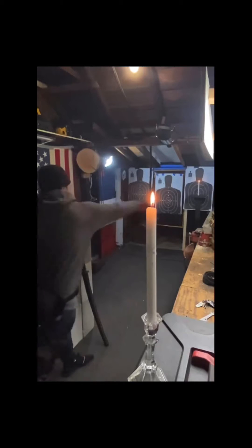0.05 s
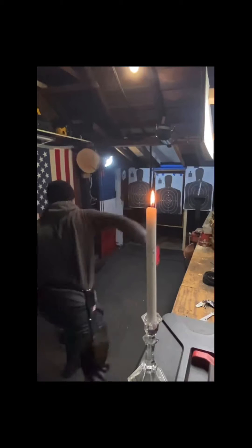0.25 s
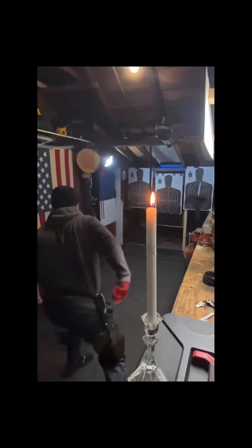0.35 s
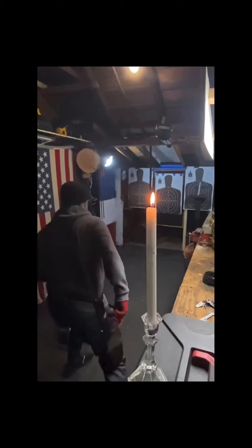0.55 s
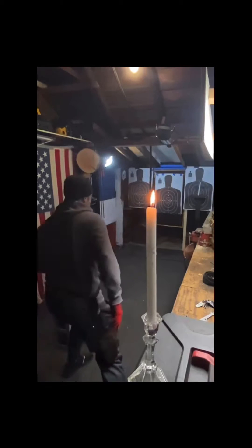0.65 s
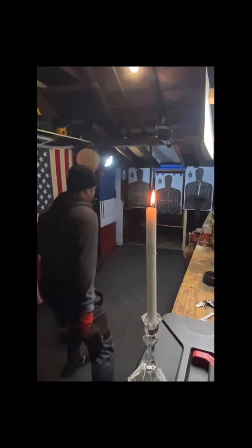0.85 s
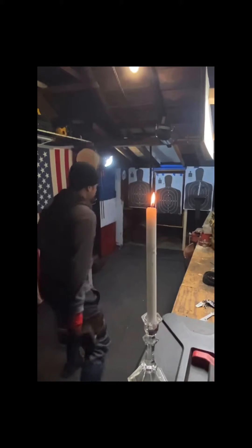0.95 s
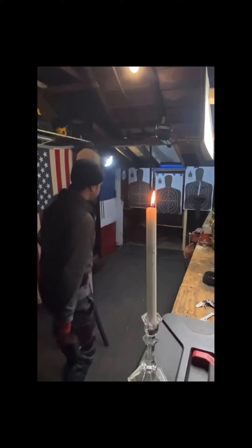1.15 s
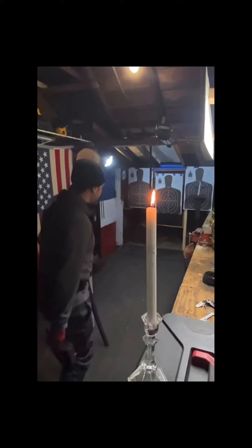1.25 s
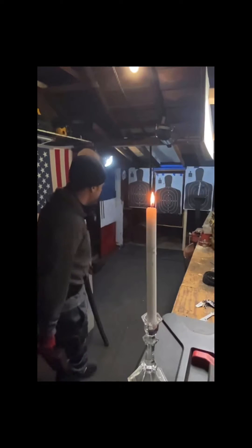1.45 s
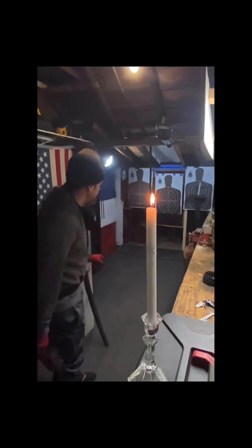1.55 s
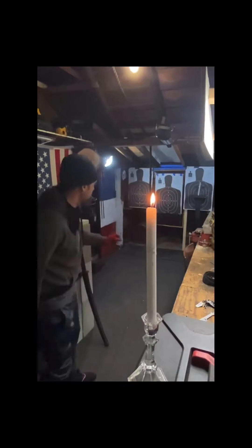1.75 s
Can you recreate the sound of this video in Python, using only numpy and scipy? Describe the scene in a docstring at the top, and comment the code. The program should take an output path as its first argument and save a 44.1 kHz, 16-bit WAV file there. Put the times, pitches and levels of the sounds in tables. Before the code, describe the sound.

A thrown knife sticks into a wooden target with a steel crack and hollow, booming knock

```python
"""A steel crack, a hollow knock and a boom in the room: a thrown knife sticks in a wooden target.
Before and after, clothes and shoes rustle over the quiet floor of a cluttered garage, where a low hum wavers.
Blade, board and room modes are decaying sines; the echo is noise that dies away band by band.
Cloth is dense random grains with hiss and ticks. Left and right are placed as for a microphone pair:
the blade is louder on the right, the knock and boom equal on both sides. No distance is simulated."""
import sys
import numpy as np
from scipy import signal
from scipy.io import wavfile

SR = 44100
rng = np.random.default_rng(int(sys.argv[2]) if len(sys.argv) > 2 else 0)


def put_to_file(sound):
    """Save the sound as 16-bit audio at rate SR, in the file named by the first command-line argument."""
    columns = np.atleast_2d(sound).T  # one column per channel
    safe = np.clip(columns, -1, 1)
    whole_steps = np.round(safe * 32767)
    wavfile.write(sys.argv[1], SR, whole_steps.astype(np.int16))


N = 79380
TIME_S = np.arange(N) / SR
OPPOSED = np.array([[1], [-1]])  # left and right in opposite polarity

# swells of clothes and shoes: (peak time [s], rise [s], fall t60 [s],
# relative body level [dB], relative hiss level [dB])
RUSTLE_SWELLS = [(.005, 0.036, 0.13, -54, -65.5), (0.059, 0.12, 0.86, -66, -69.5),
                 (0.194, 0.027, 1, -59, -89), (0.735, 0.028, 0.29, -61.5, -74.5),
                 (0.798, 0.014, .2, -89, -80.5), (.90, 0.034, 0.54, -70, -71),
                 (1.062, 0.016, 0.364, -68.5, -89), (1.12, 0.05, 0.84, -85.5, -75),
                 (1.195, 0.025, 0.24, -69.5, -78.5), (1.30, 0.043, 0.24, -76, -76.5),
                 (1.36, 0.035, 0.29, -77, -80), (1.439, 0.028, 0.48, -84, -77),
                 (1.497, 0.018, 0.3, -65.5, -80), (1.646, 0.031, 0.42, -64, -82),
                 (1.69, 0.044, 0.34, -77.5, -78.5), (1.795, 0.017, 0.18, -53.5, -74.5)]
# colour of the cloth body: (frequency [Hz], relative density [dB per Hz])
CLOTH_COLOUR = [(410, -29), (700, 0.5), (1160, -5.5), (1570, -4.5), (1850, -9), (2700, -7), (3860, -9),
                (4460, -8.5), (6000, -19.5), (7800, -47), (13200, -120)]
# colour of the fine cloth hiss: (frequency [Hz], relative density [dB per Hz])
HISS_COLOUR = [(4500, -14), (6000, -1.5), (8000, -2), (10500, -8), (13000, -11.5)]
# small ticks of gear: (time [s], strike level [dB], pitch [Hz], t60 [s])
GEAR_TICKS = [(.728, -59.5, 2985, 0.0079), (1.0462, -52, 2800, 0.0039), (1.1766, -51.5, 3900, 0.0043),
              (1.497, -57.5, 3500, 0.0054), (1.6255, -46.5, 775, 0.047), (1.633, -52, 910, 0.023),
              (1.638, -48, 3530, 0.0068), (1.639, -51.5, 2210, 0.015), (1.645, -51, 1050, 0.04),
              (1.645, -53, 3310, 0.018), (1.7835, -48, 1110, 0.069), (1.7857, -45, 1150, .03),
              (1.7905, -46.5, 2920, .015), (1.793, -44, 3820, .025)]
GRAINS_PER_S, GRAIN_SPREAD_DB = 1500, 1

# colour of the quiet floor: (frequency [Hz], relative density [dB per Hz])
FLOOR_COLOUR = [(15, -31), (25, -3), (120, -9.5), (278, -15.5), (507, -17), (593, -13.5), (750, -15),
                (1370, -25.5), (2250, -32.5), (2500, -36.5), (4940, -44), (5340, -47.5), (7910, -44.5),
                (13000, -59)]
FLOOR_DB = -57  # rms
# likeness of left and right in cloth and floor: (frequency [Hz], likeness [0 to 1])
SIDE_LIKENESS = [(60, 1), (230, 0.73), (910, 0.089), (3520, 0), (13700, 0)]
# the low hum: (time [s], rms level [dB])
HUM_LEVEL = [(0, -39.5), (.06, -62.5), (.11, -55), (.14, -54.5), (.2, -47.5), (.6, -52), (1.1, -57.5),
             (1.5, -63), (1.54, -49.5), (1.62, -50), (1.72, -53), (1.8, -57.5)]
HUM_HZ, HUM_WANDER_HZ = 76.1, 4.5  # centre, rms wander

# quick contacts of the blade tip: (time [s], strike level [dB])
BLADE_BITES = [(0.2124, -20.5), (0.214, -6.5), (0.2163, -11.5), (0.218, -14.5), (0.2216, -14),
               (0.2265, -23), (0.231, -21.5), (0.2328, -24.5), (0.2436, -27)]
# short bright rings of blade and board surface: (frequency [Hz], relative level [dB], t60 [s])
BLADE_RINGS = [(1804, -14, 0.035), (2557, -9, .02), (2920, -10, .018), (3040, -5, 0.019),
               (3335, -14.5, 0.015), (4020, -18, 0.03), (4577, -9, 0.012), (5555, -17.5, .015),
               (6000, -22.5, 0.0083), (7289, -13.5, 0.044), (8400, -18, 0.013), (9700, -17, .01),
               (10500, -20, 0.0091), (12400, -16.5, .008)]
BLADE_PAN_DB, BLADE_LAG_S = -8, .00025  # left relative to right; delay of the right
COMMON_TOP_HZ = 7800  # above this the common part of the crack is filtered away

# echo of the hit, part common to both sides: (frequency [Hz], relative density [dB per Hz])
ECHO_MID = [(88, -34), (150, -7.5), (313, 3), (498, -15), (689, -9), (804, -13.5), (971, -11.5),
            (1110, -31.5), (1300, -17), (2910, -26), (3820, -29.5), (4610, -31.5), (7580, -42),
            (8120, -102), (9000, -112), (11700, -142), (19800, -120)]
# echo of the hit, part opposed between the sides: (frequency [Hz], relative density [dB per Hz])
ECHO_SIDE = [(88, -63), (150, -32), (307, -8), (399, -21), (702, -6), (832, -10), (949, -12), (1730, -21),
             (2390, -16.5), (3680, -27), (8430, -29), (13500, -52)]
# main slope of the echo: (frequency [Hz], t60 [s])
ECHO_T60 = [(150, 0.15), (300, 0.24), (700, .27), (1500, 0.21), (3000, 0.2), (5000, 0.19), (7000, 0.2),
            (12000, .17)]
# slower slope of the echo: (frequency [Hz], level relative to the main slope [dB])
LATE_LEVEL = [(150, -10), (260, -18.5), (500, -23), (2000, -33), (5000, -40), (10000, -36)]
# fast early slope of the echo: (frequency [Hz], level relative to the main slope [dB])
EARLY_LEVEL = [(300, 1), (1500, -2.5), (3000, 0), (9000, 7)]
LATE_T60_S, EARLY_T60_S = 0.74, 0.018
# rings of board and blade that carry on in the echo: (frequency [Hz], width [Hz], lift [dB])
RINGS_IN_ECHO = [(690, 35, 1.5), (992, 58, 5), (1293, 150, -1.5), (1824, 130, 0.5), (2496, 130, 6),
                 (2977, 74, 9), (3270, 90, 4.5), (4050, 66, 2.5), (4480, 120, 10), (5540, 100, 3.5),
                 (6246, 70, 6.5), (7300, 80, 7)]
ECHO_S, ECHO_RISE_S, ECHO_MID_DB, ECHO_SIDE_DB = .2135, 0.0037, 8, 1.5
RAGGED_DB, RAGGED_PER_S = 2, 70  # uneven reflections off the clutter

# modes of the wooden board: (frequency [Hz], relative level [dB], t60 [s])
BOARD_MODES = [(175, -14, 0.55), (196.1, -16.5, .5), (215, -5, 0.37), (273.6, 3.5, 0.19), (300.5, -9, 0.39),
               (348.5, -6.5, 0.12), (387.2, -10.5, 0.2), (543.6, -18.5, .25), (628, -10, 0.15),
               (693.6, -15, 0.36), (724, -15, 0.28), (807.7, -16, 0.2), (857, -11.5, 0.21),
               (990.5, -17, 0.14)]
KNOCK_S, KNOCK_DB, KNOCK_RISE_S = .2162, -9, 0.0054
# low modes of the room: (frequency [Hz], relative level [dB], t60 [s])
ROOM_MODES = [(32.6, -19, 1.2), (54.44, -7, 0.97), (77.9, -6.5, 0.39), (93.1, -17, 1.69), (109.1, -10, .6),
              (57.73, 1, 0.54)]
BOOM_S, BOOM_DB, BOOM_RISE_S = .219, -17, 0.017

DUCK_ABOVE_DB, DUCK_SHARE, RECOVER_DB_PER_S = -20, 0.046, 1.5  # gain control; share is dB cut per dB above
CEILING, KNEE = .96, 6  # peaks bend over below full scale
CUTOFF_HZ = 13600


def from_db(db):
    """Decibels to gain."""
    return 10 ** (np.asarray(db) / 20)


def rms_one(x):
    """Scale to rms 1."""
    return x / np.sqrt(np.mean(x ** 2) + 1e-20)


def at_hz(points, hz):
    """Read a table on a log-frequency axis."""
    table_hz, values = np.transpose(points)
    return np.interp(np.log(hz), np.log(table_hz), values)


def clicks_at(s, gains):
    """Clicks of given sizes at given times."""
    out = np.zeros(N)
    samples = (np.asarray(s) * SR).astype(int)
    np.add.at(out, np.minimum(samples, N - 1), gains)
    return out


def ring(clicks, hz, t60):
    """A unit click sets a two-pole resonator ringing: a decaying sine of height 1."""
    r = from_db(-60 / (t60 * SR))
    w = 2 * np.pi * hz / SR
    return signal.lfilter([0, np.sin(w)], [1, -2 * r * np.cos(w), r * r], clicks + 1e-18)


def bands(sources, low_hz, high_hz):
    """Third-octave bands with their centre; neighbours take unrelated sources."""
    edges = low_hz * 2 ** np.arange(0, np.log2(high_hz / low_hz), 1 / 3)
    for k, (low, high) in enumerate(zip(edges, edges[1:])):
        band_pass = signal.butter(3, [low, high], "band", fs=SR, output="sos")
        yield np.sqrt(low * high), signal.sosfilt(band_pass, sources[k % 2])


def spread(spectrum, sources, low_hz, high_hz):
    """Stereo noise of a given colour and left-right likeness; rms 1."""
    out = 0
    for hz, (mid, side) in bands(sources, low_hz, high_hz):
        alike = np.clip(at_hz(SIDE_LIKENESS, hz), -1, 1)
        stereo = np.sqrt(1 + alike) * mid + np.sqrt(1 - alike) * side * OPPOSED
        out = out + from_db(at_hz(spectrum, hz)) * stereo
    return rms_one(out)


def flutter(rate):
    """Straight lines between random levels of spread 1, at a given number of levels a second."""
    knots = int(N / SR * rate) + 2
    return np.interp(TIME_S * rate, np.arange(knots), rng.standard_normal(knots))


def coloured(x, rings):
    """Resonators add their response to a sound, so that it bears their pitches."""
    out = x
    for hz, width_hz, lift_db in rings:
        r = np.exp(-np.pi * width_hz / SR)
        feedback = [1, -2 * r * np.cos(2 * np.pi * hz / SR), r * r]
        out = out + from_db(lift_db) * signal.lfilter([(1 - r * r) / 2, 0, (r * r - 1) / 2], feedback, x)
    return out


def rustle():
    """Clothes and shoes: swells of dense random grains with fine hiss on top, and single ringing ticks."""
    body_level, hiss_level = 0, 0
    for s, rise_s, t60, body_db, hiss_db in RUSTLE_SWELLS:
        rise = np.exp(-((TIME_S - s) / rise_s) ** 2)
        fall = from_db(-60 * np.maximum(TIME_S - s, 0) / t60)
        swell = np.where(TIME_S < s, rise, fall)
        body_level = body_level + from_db(body_db) * swell
        hiss_level = hiss_level + from_db(hiss_db) * swell
    shape = (2, 2, N)
    present = rng.random(shape) < GRAINS_PER_S / SR
    sizes = from_db(GRAIN_SPREAD_DB * np.minimum(rng.exponential(1, shape), 4))
    grains = present * sizes * rng.choice([-1, 1], shape)
    body = spread(CLOTH_COLOUR, grains + 1e-18, 601.0, 7000.)
    hiss = spread(HISS_COLOUR, rng.standard_normal(shape), 4502.0, 15500.)
    ticks = sum(ring(clicks_at([s], from_db(db)), hz, t60) for s, db, hz, t60 in GEAR_TICKS)
    return 2 * body_level * body + 2 * hiss_level * hiss + ticks


def room_tone():
    """Quiet floor of broad noise, and a low sine hum whose pitch wanders at random."""
    floor = spread(FLOOR_COLOUR, rng.standard_normal((2, 2, N)), 25.1, 15500.)
    level_s, level_db = np.transpose(HUM_LEVEL)
    # the first second lets the wander settle and is dropped
    wander = rms_one(signal.lfilter([1], [1, -.9995], rng.standard_normal(N + SR))[SR:])
    phase = 2 * np.pi * np.cumsum(HUM_HZ + HUM_WANDER_HZ * wander) / SR
    hum = np.sqrt(2) * np.sin(phase)  # rms 1
    return from_db(FLOOR_DB) * floor + from_db(np.interp(TIME_S, level_s, level_db)) * hum


def blade_side(lag_s, pan_db):
    """One side of the blade: each bite strikes every ring with its own random strength."""
    bite_s, bite_db = np.transpose(BLADE_BITES)
    out = np.zeros(N)
    for hz, level_db, t60 in BLADE_RINGS:
        strike_db = bite_db + level_db + pan_db + rng.normal(0, 1.6, len(bite_s))
        out += ring(clicks_at(bite_s + lag_s, from_db(strike_db)), hz, t60)
    return out


def blade():
    """Steel crack of decaying sines, louder and later on the right; its top keeps only the left-right difference."""
    left = blade_side(0, BLADE_PAN_DB / 2)
    right = blade_side(BLADE_LAG_S, -BLADE_PAN_DB / 2)
    low_pass = signal.cheby2(8, 32, COMMON_TOP_HZ, fs=SR, output="sos")
    common = signal.sosfiltfilt(low_pass, left + right)
    return (common + (left - right) * OPPOSED) / 2


def echo():
    """Echo of the hit: noise bearing its rings, that rises fast and dies band by band on three slopes."""
    t = np.maximum(TIME_S - ECHO_S, 0)
    rise = 1 - np.exp(-(t / ECHO_RISE_S) ** 2)
    noise = coloured(rng.standard_normal((2, 2, N)), RINGS_IN_ECHO)
    mids, sides = 0, 0
    for hz, (mid, side) in bands(noise, 141.9, 15500.):
        main = from_db(-60 * t / at_hz(ECHO_T60, hz))
        late = from_db(at_hz(LATE_LEVEL, hz) - 60 * t / LATE_T60_S)
        early = from_db(at_hz(EARLY_LEVEL, hz) - 60 * t / EARLY_T60_S)
        fall = (main + late + early) * from_db(RAGGED_DB * flutter(RAGGED_PER_S))
        mids = mids + from_db(at_hz(ECHO_MID, hz) + ECHO_MID_DB) * mid * fall
        sides = sides + from_db(at_hz(ECHO_SIDE, hz) + ECHO_SIDE_DB) * side * fall
    return rise * (mids + sides * OPPOSED)


def struck(modes, s, db, rise_s):
    """One blow sets modes ringing, neighbours in opposite polarity; the sound builds up over the rise time."""
    t = np.maximum(TIME_S - s, 0)
    rings = 0
    for k, (hz, level_db, t60) in enumerate(modes):
        rings = rings + (-1) ** k * from_db(level_db) * ring(clicks_at([s], -from_db(db)), hz, t60)
    return rings * (1 - np.exp(-(t / rise_s) ** 2))


def knock():
    """Hollow knock: the decaying modes of the wooden board."""
    return struck(BOARD_MODES, KNOCK_S, KNOCK_DB, KNOCK_RISE_S)


def boom():
    """Boom of the garage: its low modes, slower to build up than the knock."""
    return struck(ROOM_MODES, BOOM_S, BOOM_DB, BOOM_RISE_S)


def scene():
    """Rustle and room tone throughout, with the hit and its echo on top."""
    return rustle() + room_tone() + blade() + echo() + knock() + boom()


def record(dry):
    """Gain control ducks after the loud hit and recovers; peaks are slightly rounded, the top is cut."""
    power = signal.lfilter([.001], [1, -.999], np.mean(dry ** 2, axis=0))
    level_db = 10 * np.log10(power + 1e-12)
    cut_db = DUCK_SHARE * np.maximum(level_db - DUCK_ABOVE_DB, 0)
    # the cut deepens at once and eases off at a steady rate
    recovered_db = RECOVER_DB_PER_S * TIME_S
    cut_db = np.maximum.accumulate(cut_db + recovered_db) - recovered_db
    even = dry * from_db(-cut_db)
    rounded = even / (1 + np.abs(even / CEILING) ** KNEE) ** (1 / KNEE)
    low_pass = signal.cheby2(16, 70, CUTOFF_HZ, fs=SR, output="sos")
    return signal.sosfilt(low_pass, rounded)


dry = scene()
out = record(dry)
put_to_file(out)
```